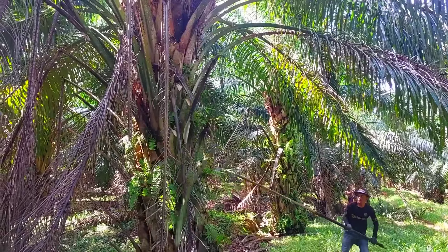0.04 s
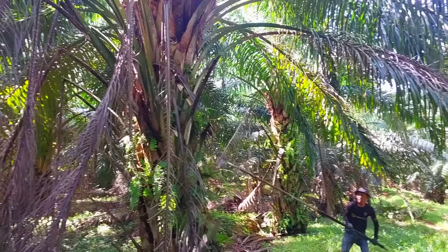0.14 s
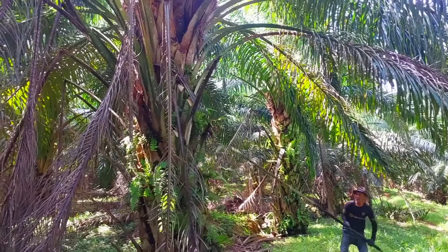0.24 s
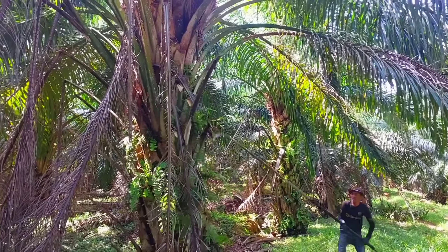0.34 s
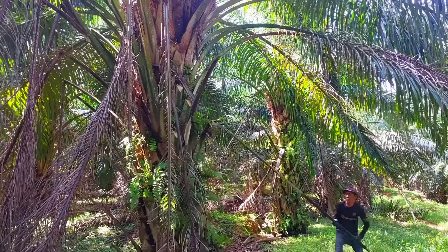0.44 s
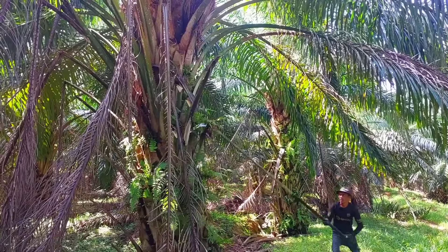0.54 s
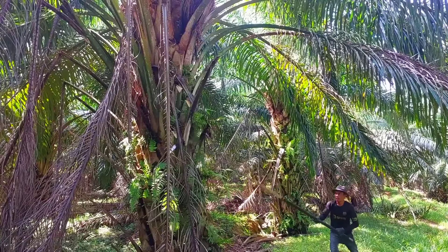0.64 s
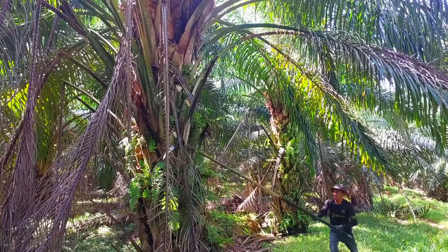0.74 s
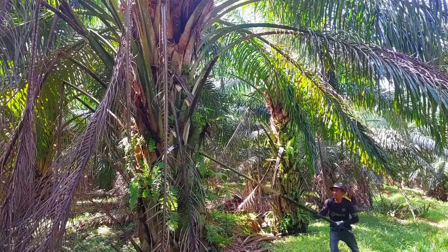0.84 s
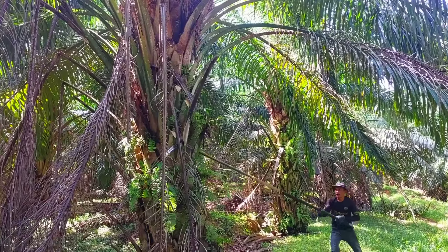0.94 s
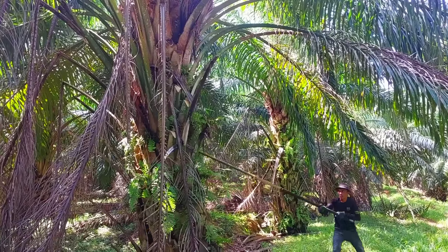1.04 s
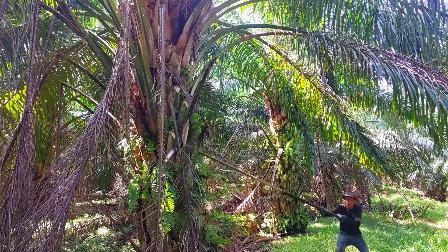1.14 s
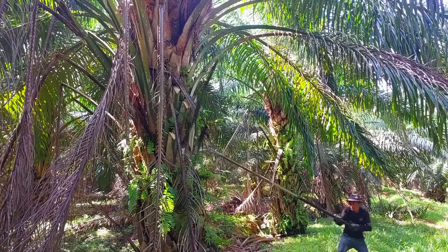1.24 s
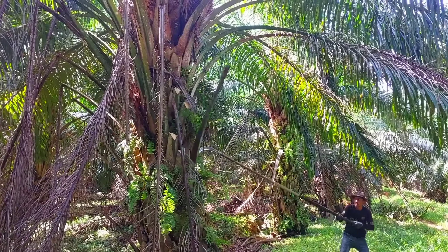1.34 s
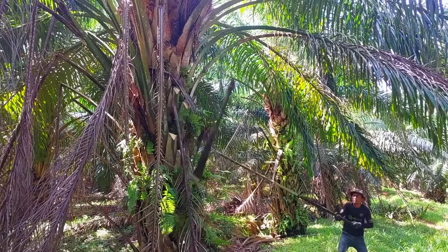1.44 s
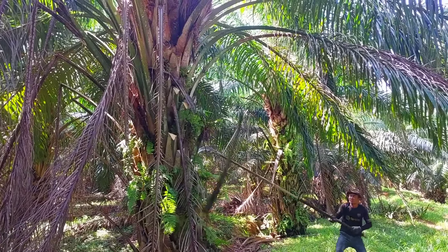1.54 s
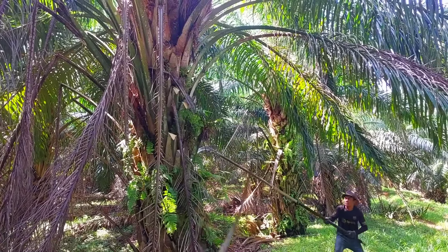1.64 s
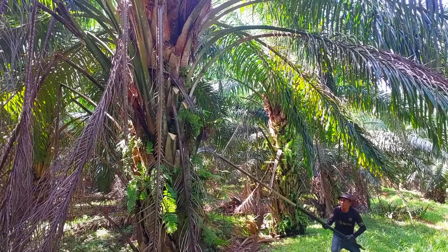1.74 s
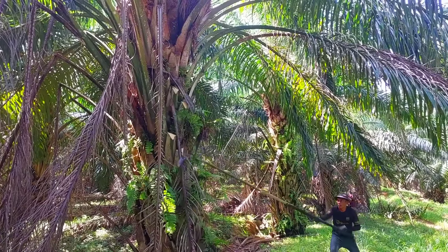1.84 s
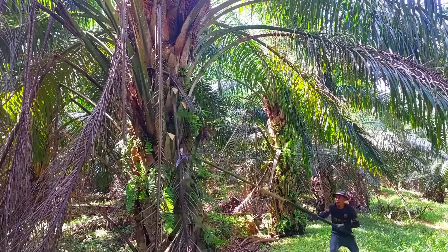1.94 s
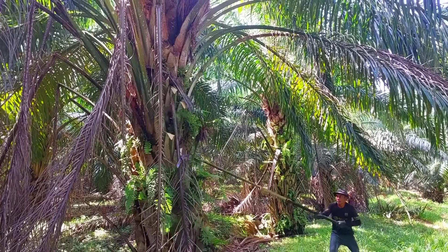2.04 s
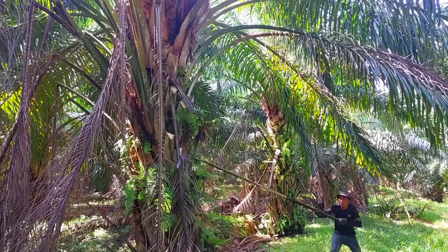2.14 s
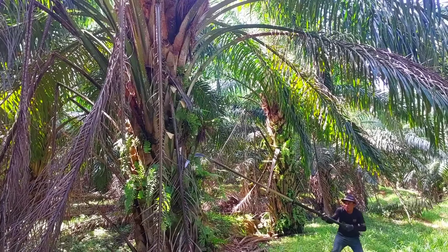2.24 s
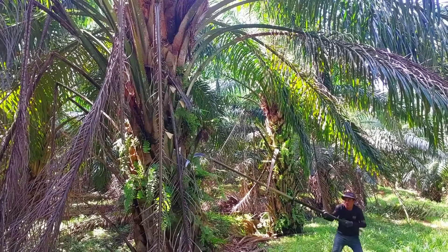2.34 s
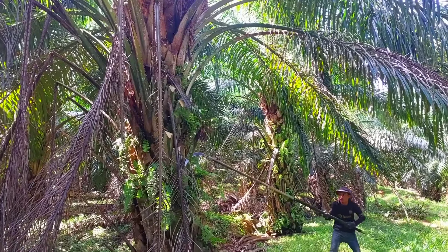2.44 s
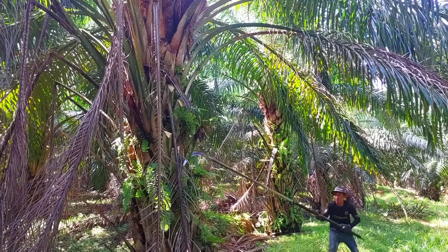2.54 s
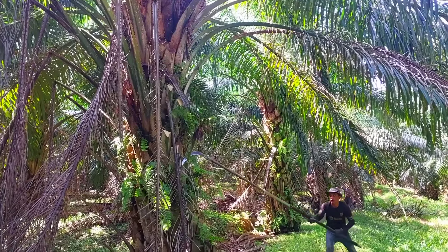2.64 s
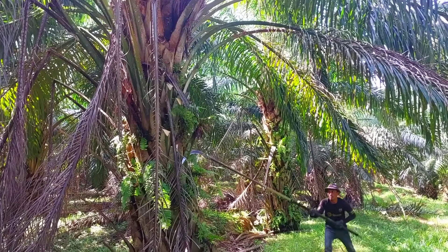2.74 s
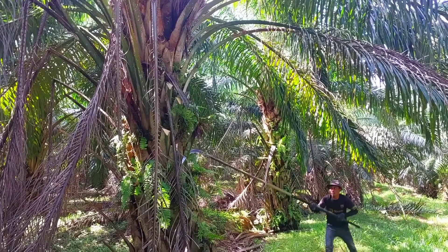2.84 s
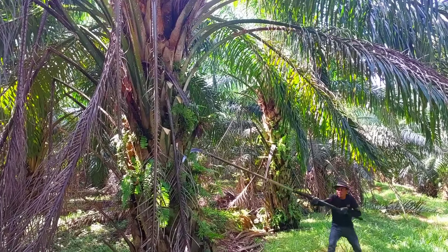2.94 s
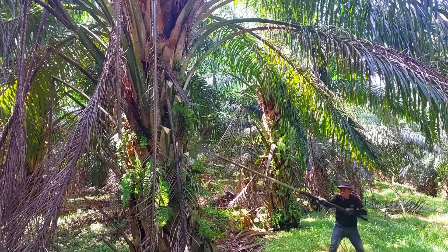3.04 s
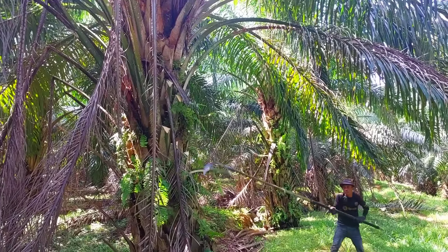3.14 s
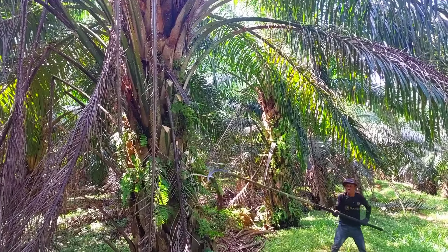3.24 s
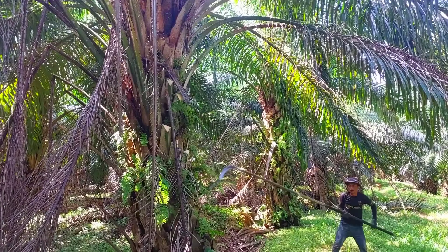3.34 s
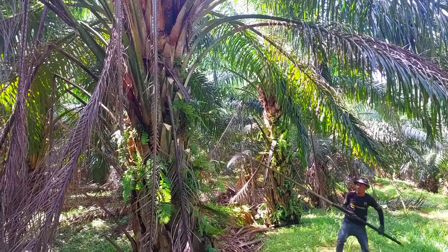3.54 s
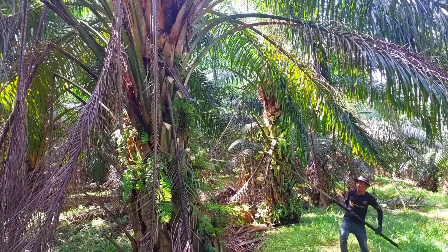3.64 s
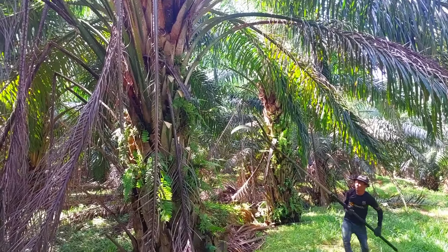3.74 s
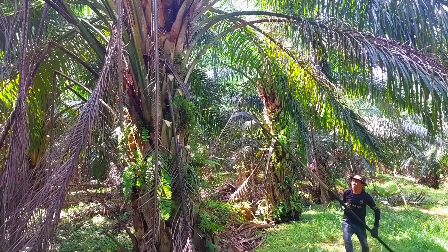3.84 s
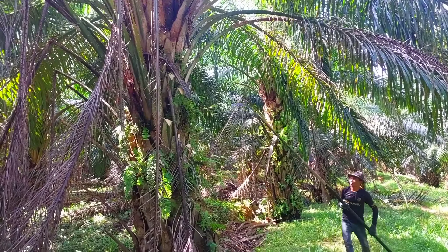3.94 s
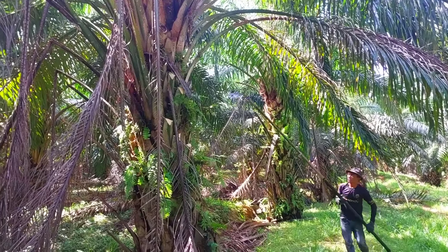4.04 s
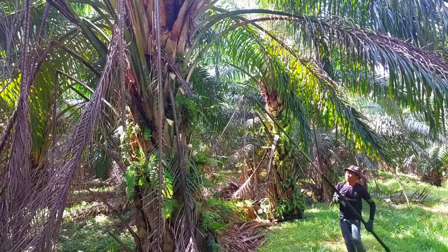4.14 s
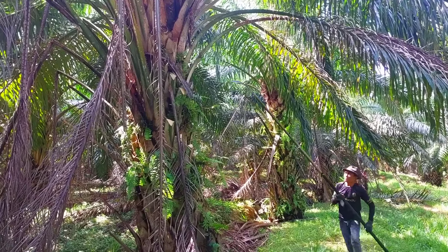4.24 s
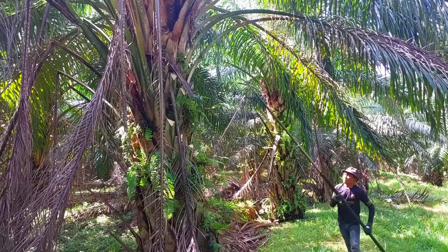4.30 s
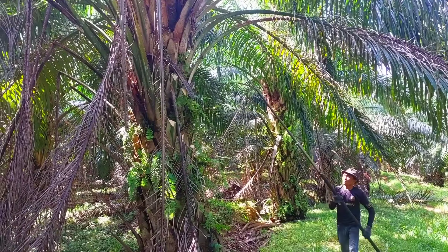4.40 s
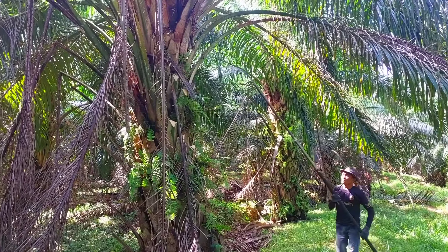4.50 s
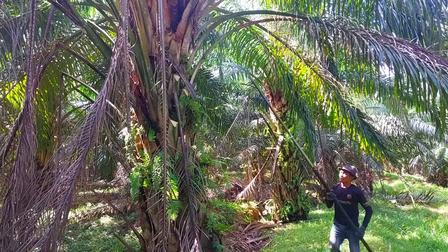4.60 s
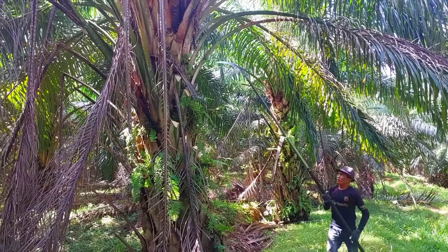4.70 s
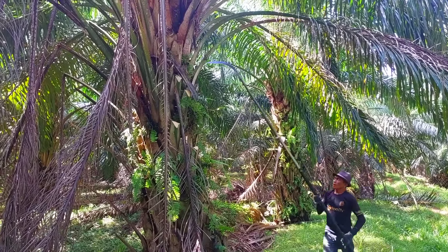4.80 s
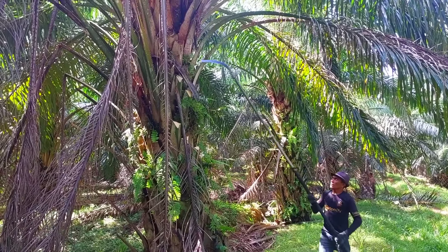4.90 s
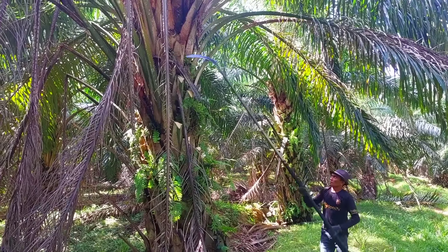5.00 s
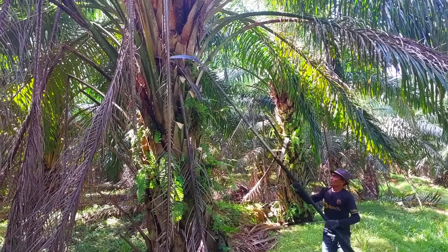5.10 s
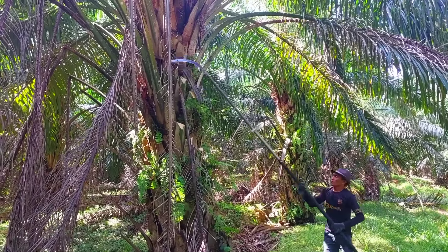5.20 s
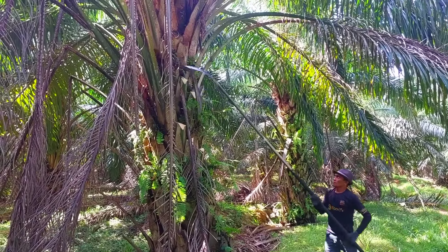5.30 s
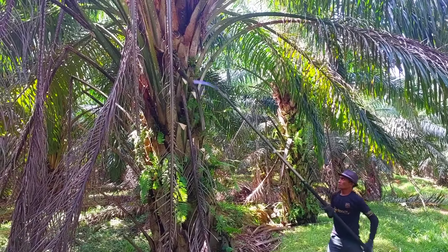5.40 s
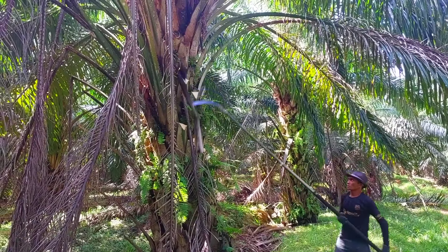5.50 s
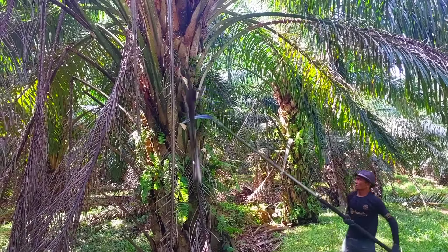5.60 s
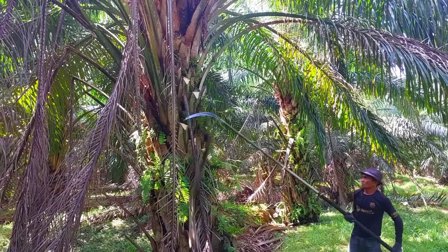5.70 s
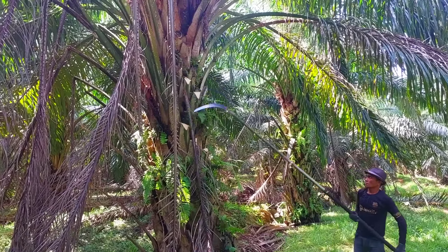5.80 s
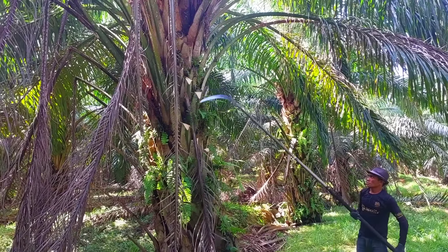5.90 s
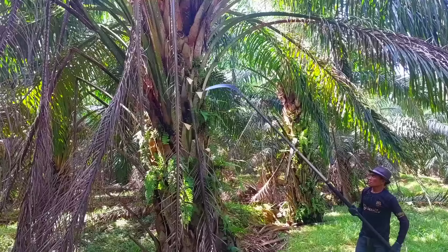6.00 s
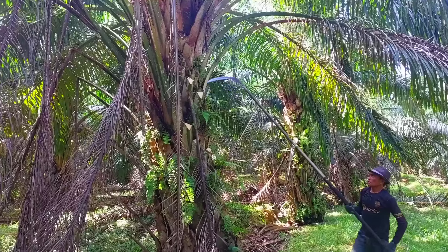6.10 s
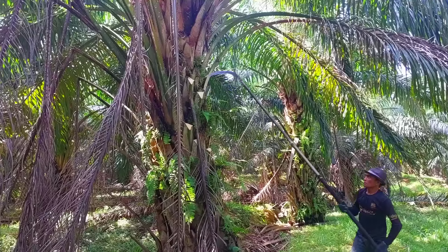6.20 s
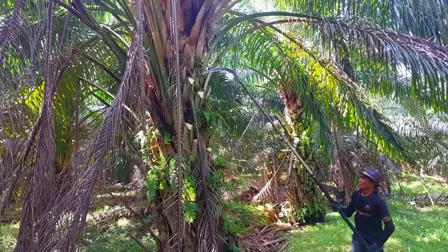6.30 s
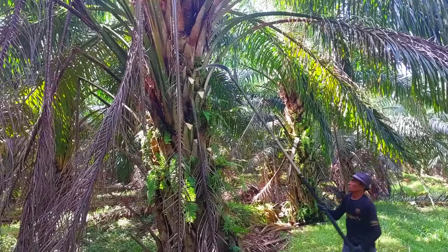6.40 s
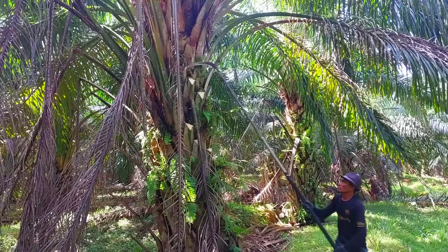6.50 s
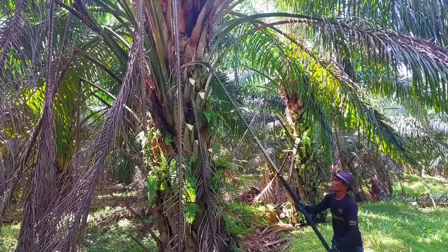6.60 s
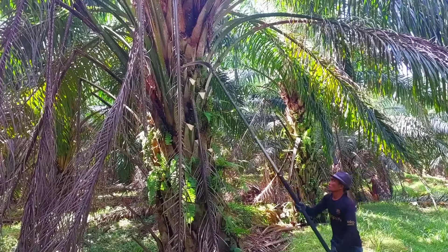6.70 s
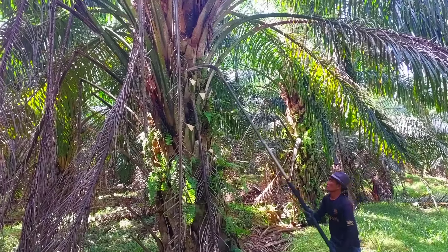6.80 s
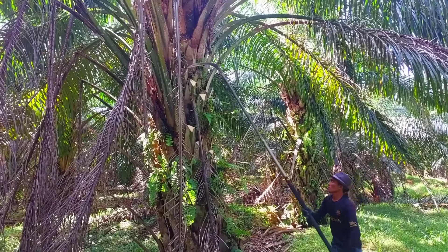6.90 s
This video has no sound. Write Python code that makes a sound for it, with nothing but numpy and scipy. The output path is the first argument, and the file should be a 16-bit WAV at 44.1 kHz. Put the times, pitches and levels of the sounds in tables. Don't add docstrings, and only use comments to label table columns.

```python
import sys
import numpy as np
from scipy import signal
from scipy.fft import rfft, irfft, next_fast_len
from scipy.io import wavfile
from scipy.ndimage import uniform_filter1d

SR = 44100
rng = np.random.default_rng(int(sys.argv[2]) if len(sys.argv) > 2 else 0)


def gain_from_db(level_db):
    decades = np.asarray(level_db, float) / 20
    return 10 ** decades


def inscribe(sig):
    pcm = np.round(np.clip(np.atleast_2d(sig).T, -1, 1) * 32767)
    wavfile.write(sys.argv[1], SR, pcm.astype(np.int16))


N = 306495
TIME = np.arange(N) / SR


def noise(count):
    return rng.standard_normal((2, count))


def level(x, db):
    return x * gain_from_db(db) / np.sqrt(np.mean(x ** 2))


def along(points, count):
    hz, value = np.transpose(points)
    bins = np.fft.rfftfreq(count, 1 / SR)
    return np.interp(np.log(bins + 1), np.log(hz + 1), value)


def over_time(points):
    return np.interp(TIME, *np.transpose(points))


def colour(x, points):
    cepstrum = irfft(along(points, count=4096) * np.log(10) / 20)
    cepstrum[1:2048] *= 2
    cepstrum[2049:] = 0
    impulse = irfft(np.exp(rfft(cepstrum)))
    return signal.fftconvolve(x, impulse[None])[:, :N]


def ring(x, hz, width_hz):
    return signal.lfilter(*signal.iirpeak(hz, hz / width_hz, fs=SR), x)


def walk(rate):
    k = int(SR / rate)
    return uniform_filter1d(np.repeat(rng.standard_normal(N // k + 1), k), k)[:N]


# time in seconds, level in dB.
HUSH = [(0, -2), (1.1, -4), (2.3, 1.5), (2.8, -4), (4.1, -2.5), (4.45, -2.5), (5.15, -5.5), (5.3, -2)]


def hush():
    return gain_from_db(over_time(HUSH))


# frequency in Hz, density in dB per Hz.
AIR = [(25, -15.5), (98, -4), (120, 9), (159, -24.5), (1990, -15), (3140, -28.5), (3490, -20.5),
       (4110, -29), (5090, -7), (6140, -20), (7210, -9.5), (8480, -18), (15300, -14.5)]


def air():
    return level(colour(noise(N), AIR), -60.5) * gain_from_db(0.92 * walk(3)) * hush()


# time in seconds, level in dB.
DRONE = [
    (0, -74),
    (1.1, -80),
    (2.6, -68),
    (4.3, -76),
    (5, -85),
    (5.8, -66),
    (6.15, -78),
    (6.3, -55),
    (6.95, -57.5),
]


def drone():
    phase = 2 * np.pi * np.cumsum(118 * (1 + 0.024 * walk(25))) / SR
    loud = gain_from_db(over_time(DRONE) + 1.3 * walk(36))
    return loud * (np.sin(phase) + 0.029 * np.sin(2 * phase)) * [[1], [0]]


# centre in Hz, width in Hz, level in dB, waver in dB.
CICADAS = [
    (2340, 500, -69.5, 0.5),
    (4670, 340, -61.5, 0.5),
    (5460, 700, -65, 2),
    (7090, 510, -57.5, 1.1),
]


def cicadas():
    out = np.zeros((2, N))
    for hz, width_hz, db, waver_db in CICADAS:
        choir = ring(ring(noise(N), hz, width_hz), hz, 1.1 * width_hz)
        waver = gain_from_db(waver_db * (walk(2.64) + walk(87)))
        out += level(choir, db) * waver * (hush() if hz < 3000 else 1)
    return out


# centre in seconds, level in dB, half length in seconds.
SWELLS = [
    (1.1, -73, 1.7),
    (3.92, -74, .08),
    (4.1, -65.5, 0.085),
    (4.3, -62, 0.083),
    (4.601, -70.5, 0.11),
    (4.779, -61, 0.098),
    (5.074, -63.5, 0.093),
    (5.7, -75.5, .6),
    (6.95, -73.5, .12),
]


def high_cicada():
    high = ring(ring(noise(N), 11000, 2600), 13000, 3000)
    swell = gain_from_db(-80) + sum(gain_from_db(db) * np.exp(-((TIME - s) / half_s) ** 2) for s, db, half_s in SWELLS)
    return level(high, 0) * swell


def grove():
    return air() + cicadas() + high_cicada() + drone()


def trunks(x, t60=0.26, db=-18, gap_s=0.0053):
    t = np.arange(SR) / SR
    tail = ring(noise(SR) * gain_from_db(-60 * t / t60) * (1 - np.exp(-t / gap_s)), 2200, 5400)
    return gain_from_db(db) * signal.fftconvolve(x, tail / np.sqrt(np.sum(tail[0] ** 2)), axes=1)[:, :N]


# start in seconds, peak in dB.
THUMPS = [(0.229, -54.5), (0.338, -48), (0.721, -47), (1.277, -42), (1.81, -38), (1.919, -49.5),
          (2.074, -50), (2.419, -54), (3.059, -48.5), (3.365, -50), (3.717, -47), (5.655, -52),
          (5.889, -52.5)]


def thumps():
    out = np.zeros((2, N + SR))
    t = np.arange(SR // 2) / SR
    envelope = (1 - np.exp(-t / 0.009)) * gain_from_db(-60 * t / 0.28)
    for s, db in THUMPS:
        hz = 62 * (1 + .15 * rng.uniform(-1, 1))
        thump = np.sin(2 * np.pi * hz * t) * envelope
        out[0, int(s * SR):int(s * SR) + len(t)] += gain_from_db(db) * thump / thump.max()
    return out[:, :N]


def blow(db, hz, t60, push_s, sharp, other, other_db):
    t = np.arange(SR // 4) / SR
    push = noise(len(t)) * (1 - np.exp(-t / push_s)) * gain_from_db(-60 * t / t60)
    body = ring(push, hz, hz / sharp) + 0.26 * ring(push, hz, 0.99 * hz)
    second = signal.sosfilt(other, push)
    return gain_from_db(db) * (body / abs(body[0]).max() + gain_from_db(other_db) * second / abs(second[0]).max())


def lay(blows):
    out = np.zeros((2, N + SR))
    for s, sound in blows:
        out[:, int(s * SR):int(s * SR) + sound.shape[1]] += sound
    return out[:, :N]


# start in seconds, peak in dB, ring in Hz.
STALK_KNOCKS = [(0.236, -22, 212), (0.331, -30, 282), (.645, -32, 308), (.713, -21.5, 293),
                (1.289, -15.5, 370), (1.303, -21.5, 316), (1.468, -31, 306), (1.677, -32, 376),
                (1.712, -23.5, 390), (1.804, -16.5, 261), (1.88, -25, 305), (1.924, -16.5, 243),
                (2.652, -38.5, 320), (3.028, -23.5, 313), (3.109, -41, 330), (3.185, -19.5, 360),
                (3.362, -10, 430), (3.715, -30.5, 170), (4.043, -41.5, 283), (4.272, -53.5, 313),
                (4.373, -51, 216), (4.5, -52.5, 253), (4.769, -50, 212), (4.82, -49.5, 277),
                (4.869, -44, 250), (5.18, -30.5, 226), (5.643, -25.5, 310), (6.046, -20.5, 253),
                (6.318, -36, 326), (6.448, -39.5, 244)]
# start in seconds, peak in dB, ring in Hz.
RIB_KNOCKS = [(.185, -25.5, 940), (.251, -16, 860), (.969, -44.5, 720), (1.256, -15, 740),
              (1.834, -11, 850), (2.273, -31, 1040), (2.93, -43.5, 747), (2.995, -31, 726),
              (3.343, -16, 763), (5.888, -11, 877), (6.088, -38, 840), (6.59, -51, 1030)]


def knocks():
    thud = signal.butter(2, [50, 150], "band", fs=SR, output="sos")
    rattle = [(1.728 + k * .0163, -30.5, 354) for k in range(4)]
    blows = [(s, blow(db, hz, 0.056, 0.0024, 4.5, thud, -30)) for s, db, hz in RIB_KNOCKS]
    blows += [(s, blow(db, hz, 17 / hz, 0.0013, 7.5, thud, -36.5)) for s, db, hz in STALK_KNOCKS + rattle]
    return lay(blows)


# start in seconds, peak in dB,
# ring in Hz, top over ring in dB.
SNAPS = [(0.1832, -25.5, 2230, -1), (0.2341, -15.5, 2140, -5.5), (0.2522, -11, 1680, -6),
         (0.332, -10, 2310, -9.5), (0.3805, -19, 2330, -35.5), (0.4, -23.5, 2150, -5.5),
         (0.4533, -25, 5200, -6.5), (0.4928, -27.5, 2320, -9), (0.6442, -31.5, 1920, -23),
         (0.6826, -30, 2100, 0), (0.7155, -20, 2680, -5.5), (1.2371, -16, 2270, -10),
         (1.259, -11.5, 2410, -9.5), (1.3084, -7, 2630, -19.5), (1.4231, -33.5, 3060, -5),
         (1.791, -13.5, 2370, -18.5), (1.8123, -7, 2280, -13.5), (1.8656, -20, 2000, -14),
         (1.9053, -9, 5460, -13.5), (1.9084, -12, 2760, -29.5), (1.9249, -16, 2260, -9),
         (2.239, -19, 2000, -18.5), (2.2932, -21, 1800, -14), (2.9307, -36, 1770, -21.5),
         (3.188, -13, 2600, -15.5), (3.3433, -18.5, 1850, -3.5), (3.361, -12, 1440, -35),
         (3.714, -61, 2340, 22), (4.0432, -35.5, 2330, -20), (5.179, -29, 1920, -32),
              (5.2414, -28, 1930, 7.5), (5.3149, -24, 1884, -15), (5.642, -40, 2220, -17.5),
              (5.8376, -33, 2240, 6.5), (5.8897, -9.5, 1530, -8), (6.134, -29.5, 2330, -6),
              (6.3229, -22, 2080, -6.5), (6.4627, -34.5, 1400, -21), (6.5915, -38, 2710, -17),
              (6.78, -32.5, 1840, -29)]


def snaps():
    top = signal.butter(3, [4500, 14800], "band", fs=SR, output="sos")
    return lay([(s, blow(db, hz, 0.041, 0.00019, 11.0, top, top_db))
                for s, db, hz, top_db in SNAPS])


def crackle(per_s, spread_db, smear_s, flutter_db):
    sizes = gain_from_db(np.minimum(spread_db * rng.exponential(size=N), 18))
    ticks = (rng.random(N) < per_s / SR) * sizes
    fall = np.exp(-1 / (smear_s * SR))
    power = signal.lfilter([1], [1, -fall], ticks ** 2) + 1
    return np.sqrt(power) * noise(N) * gain_from_db(flutter_db * walk(80))


def patchy(x, low_hz, count, patchy_db, rate):
    pitches = low_hz * 2 ** (np.arange(count) / 4)
    return sum(ring(x, hz, hz / 2.4) * gain_from_db(patchy_db * walk(rate)) for hz in pitches)


# start in seconds, rise in seconds,
# leaflet level in dB, fall in dB per second, wood level in dB.
TUGS = [(.09, 0.15, -42, 108, -48.5), (.232, 0.03, -26.5, 53, -38.5), (.33, 0.02, -32.5, 180, -34.5),
        (.642, 0.013, -47.5, 72, -47), (.7, 0.013, -34, 270, -32.5), (1.19, 0.068, -28, 102, -31.5),
        (1.28, 0.019, -29, 130, -29), (1.42, 0.027, -49, 2, -53.5), (1.675, .04, -59, 34, -46.5),
        (1.785, 0.027, -28, 77, -28.5), (1.88, 0.056, -35.5, 128, -28), (2.232, 0.0065, -32, 250, -42),
        (2.25, 0.05, -36.5, 155, -32.5), (3.014, 0.048, -26.5, 88, -32.5), (3.176, 0.03, -34.5, 82, -40.5),
        (3.32, 0.055, -36.5, 174, -36.5), (5.177, 0.0024, -43.5, 170.5, -41.5),
        (5.231, 0.004, -37, 47, -40), (5.27, 0.089, -40, 200, -38), (5.637, .004, -44.5, 91, -50),
        (5.83, 0.015, -35, 100, -57), (5.885, 0.0054, -30, 34, -34), (6.04, 0.0068, -45, 72.5, -39),
        (6.58, 0.018, -42.5, 274, -45.5)]
# start in seconds, rise in
# seconds, leaflet level in dB, wood level in dB.
BRUSHES = [(-.05, 0.075, -58.5, -56.5), (.59, 0.066, -80, -42.5), (.74, 0.017, -56, -40.5),
           (.8, 0.055, -79, -51.5), (.86, 0.034, -76, -50), (.94, 0.038, -62, -54.5),
           (1.196, .008, -39.5, -43), (1.46, 0.03, -44, -38.5), (2.1, .12, -59, -49.5),
           (2.36, 0.073, -44.5, -45.5), (2.629, 0.047, -65, -49.5), (2.915, 0.025, -71, -48),
           (3.326, .004, -37, -39), (3.712, 0.018, -56, -47.5), (3.8, 0.024, -53.5, -69),
           (3.96, 0.15, -53, -57.5), (4.26, 0.022, -65.5, -58), (4.351, 0.073, -85, -60),
           (4.721, 0.058, -53.5, -68), (4.8, .08, -74.5, -62.5), (5.0, 0.128, -73, -84),
           (5.45, 0.13, -51, -64), (5.655, 0.024, -69, -40), (5.871, 0.0055, -23, -44.5),
           (6.12, 0.14, -53, -55), (6.31, 0.013, -44, -49), (6.759, 0.007, -56, -58),
           (6.86, .09, -57.5, -80)]


def effort(wood_share, gain_db, fall_factor, settle_db, settle_db_s, stiff):
    brush_fall_db_s, let_go_db_s, rise_power = 148, 224, 1.25
    rows = TUGS + [(s, rise, leaf, brush_fall_db_s, wood) for s, rise, leaf, wood in BRUSHES]
    start, rise, leaf_db, fall, wood_db = np.transpose(rows)[:, :, None]
    t = TIME[::48]
    next_peak = start[1:len(TUGS)] + rise[1:len(TUGS)]
    taken = np.append(next_peak, np.full(len(BRUSHES) + 1, N / SR))[:, None]
    after = np.maximum(t - start - rise, 0)
    fast_db = -fall_factor * fall * after - let_go_db_s * np.maximum(t - taken, 0)
    slow_db = settle_db - settle_db_s * after
    shape = np.clip((t - start) / rise, 0, 1) ** rise_power * (gain_from_db(2 * fast_db) + gain_from_db(2 * slow_db))
    held_db = stiff * np.minimum(wood_db + 35.5, 0)
    peak = gain_from_db(2 * (gain_db + leaf_db + wood_share * (wood_db - leaf_db) + held_db))
    return np.interp(TIME, t, np.sqrt(np.sum(peak * shape, axis=0)))


# frequency in Hz, density in dB per Hz.
LEAF = [(1650, -17.5), (2800, -16.5), (3100, -19), (4840, 6), (5980, 0.5), (7020, 2), (7770, -7),
        (11300, -1), (14700, -8.5), (15500, -7.5), (16000, -44.5)]
FIBRE = [(530, -18.5), (900, -14), (1620, -10), (1910, -6), (2120, -4.5), (2370, -1.5), (2940, -8),
         (3600, -12), (4680, -2.5), (7920, -120)]
RIB = [(400, -16.5), (600, -2), (820, 0), (1050, -8), (1400, -16.5), (2500, -43.5)]
STALK = [(30, -41), (60, -19), (90, -20), (170, -11.5), (305, -7.5), (450, -8.5), (650, -26), (1500, -58)]
# share of the wood level 0-1, gain in dB, fall factor,
# settling level under the peak in dB, settling fall in dB per second.
PARTS = [
    (0.0, -1.13, 0.74, -26, 55),
    (.45, 1.5, 1.07, -16.5, 56),
    (.85, -4.5, 2.58, -14, 69.5),
    (1.0, -4.24, 1.83, -14.5, 61.5),
]


def fronds():
    jerks = crackle(1200, spread_db=2.5, smear_s=0.0011, flutter_db=0.62)
    slips = crackle(280, spread_db=4.5, smear_s=.0015, flutter_db=1.16)
    crunch = patchy(jerks, 850, count=18, patchy_db=2.7, rate=65)
    stalk = colour(jerks + .4 * slips, STALK)
    stalk = stalk + gain_from_db(5.5) * ring(stalk, 314.5, 22) * (TIME < 3.6)
    parts = colour(crunch, LEAF), colour(crunch, FIBRE), colour(slips, RIB), stalk
    stiffness = (0, 0, .3, 0)
    return sum(level(part, 0) * effort(*answer, stiff)
               for part, answer, stiff in zip(parts, PARTS, stiffness))


# frequency in Hz, likeness from 0 to 1.
ALIKE = [(250, .98), (500, .94), (950, .8), (1250, .32), (2000, .2), (4000, 0)]
# frequency in Hz, left minus right in dB.
LEAN = [(700, -.2), (1290, -2), (2380, -4.5), (4400, 0), (8120, -3.8), (15000, -1.5)]


def ports(x):
    size = next_fast_len(N + SR // 10)
    alike = np.clip(along(ALIKE, count=size), 0, 1)
    lean_db = along(LEAN, count=size)
    mid, side = rfft(x, size) * np.sqrt([1 + alike, 1 - alike])
    left_right = np.array([mid + side, mid - side]) * gain_from_db(np.array([lean_db, -lean_db]) / 2)
    return irfft(left_right, size)[:, :N]


def scene():
    work = thumps() + knocks() + snaps() + fronds()
    return ports(work + trunks(work) + grove()) / np.sqrt(2)


def low_pass(x):
    return signal.sosfilt(signal.butter(12, 16810, fs=SR, output="sos"), x)


def record(dry):
    top = signal.ellip(5, .3, 28, 15300, fs=SR, output="sos")
    return low_pass(signal.sosfilt(top, dry))


dry = scene()
out = record(dry)
inscribe(out)
```